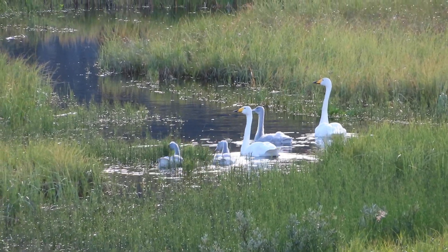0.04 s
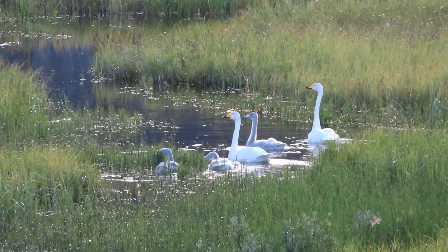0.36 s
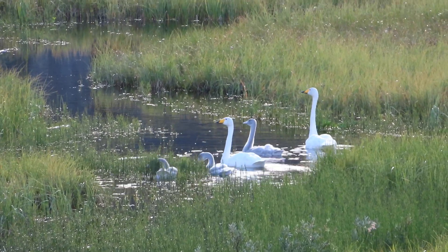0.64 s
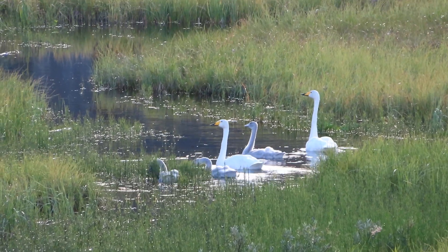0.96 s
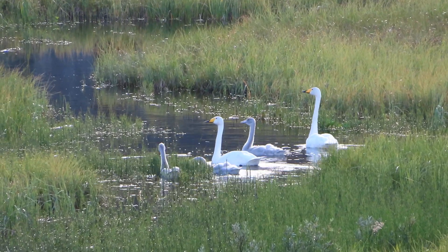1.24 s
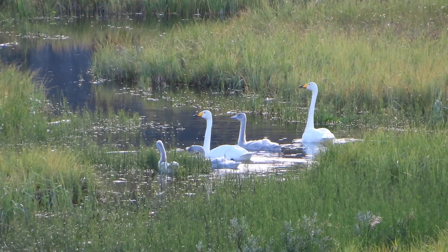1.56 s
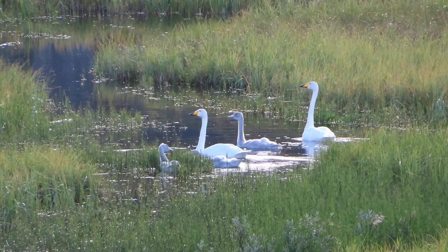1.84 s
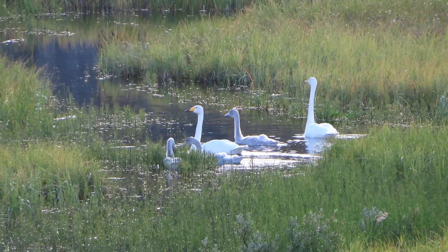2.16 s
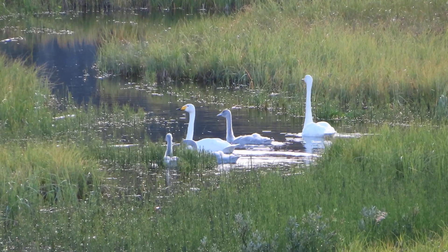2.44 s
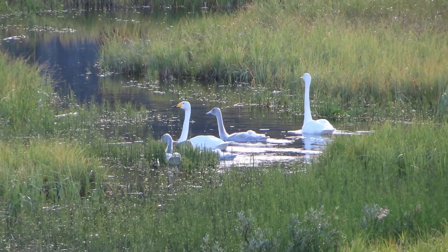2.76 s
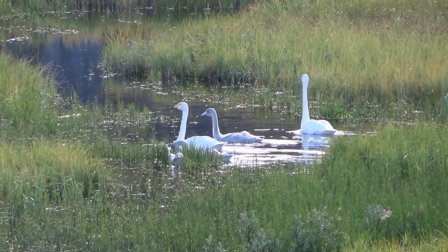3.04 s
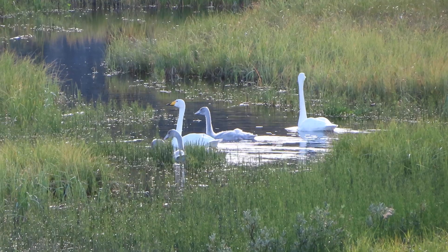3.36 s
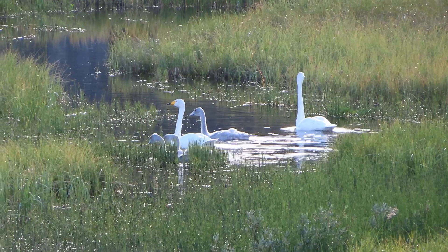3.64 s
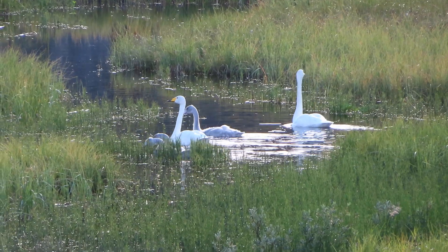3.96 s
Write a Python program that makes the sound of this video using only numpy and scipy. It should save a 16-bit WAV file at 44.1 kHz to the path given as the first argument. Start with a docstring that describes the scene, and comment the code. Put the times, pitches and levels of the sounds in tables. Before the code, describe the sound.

Short, high swan honks repeat at an even pace outdoors, each with a slight echo off the marsh. Wind buffets the microphone throughout over a soft hiss of grass, and cygnets peep faintly between the calls.

```python
"""A swan repeats a short high honk on a marshy pond: a harmonic source, filtered by throat and beak,
starts in a low register, breaks upward into a clear arch and sags away as the air runs out.
Thin peeps, probably the cygnets, and a few dry ticks fall in between. Reeds scatter the calls and
the far bank returns them. Gusts buffet the microphone over a soft hiss of grass."""
import sys
import numpy as np
from scipy import signal
from scipy.fft import rfft, irfft
from scipy.io import wavfile
from scipy.ndimage import uniform_filter1d

SR = 44100
rng = np.random.default_rng(int(sys.argv[2]) if len(sys.argv) > 2 else 0)


def wrap_up_sound(samples):
    """Save the sound to the file named by the first command line argument, as 16-bit audio."""
    columns = np.atleast_2d(samples).T
    # keep every value between -1 and 1, then stretch to whole-number steps
    tamed = np.clip(columns, -1, 1)
    steps = np.round(tamed * 32767).astype(np.int16)
    wavfile.write(sys.argv[1], SR, steps)


N = 176400
T = np.arange(N) / SR

# Resonances of throat and beak: f/Hz, gain/dB
THROAT_RESPONSE = [(600, -20), (1000, -3), (1230, -2), (1550, -2.5), (2000, -4), (2450, -2), (2950, -7.5),
                   (3650, -5.5), (4250, -14), (4900, -19), (5600, -12.5), (5980, -20), (6170, -34.5),
                   (6600, -14.5), (7350, -27.5), (7900, -29.5), (8600, -37), (9400, -60), (11000, -52.5),
                   (12300, -50.5), (13500, -51), (16000, -78.5)]
LOW_START_HZ, LOW_END_HZ, LOW_S = 576.6, 815, .032   # the climb before the register break
BREAK_S, ROUGH_S, CATCH_S, CATCH_DB = .0026, .0034, .004, 5   # the voice jumps, roughens and catches
SCOOP_HZ, WAVER_HZ = 68.4, 3.9   # the jump lands below the crest; the pitch wavers
SAG_HZ, SAG_DB, DROP_HZ, DROP_DB = 211.5, 6, 165, 14.5   # a gentle sag, then a drop as air runs out

def honk(t, rise, fall, crest_hz, db, bright_db, low_db, fundamental_db):
    """Source and filter: harmonics glide through fixed resonances; the register breaks at t = 0."""
    early = np.maximum(-t / LOW_S, 0)
    below_crest = np.clip(1 - t / rise, 0, 1)
    falling = np.maximum((t - rise) / fall, 0)
    drop = np.minimum(falling, 1) ** 6 + 4 * np.maximum(falling - 1, 0)
    upper = .5 + .5 * np.tanh(t / BREAK_S)   # 0 in the low register, 1 in the high
    low_hz = LOW_END_HZ - (LOW_END_HZ - LOW_START_HZ) * early
    high_hz = crest_hz - SCOOP_HZ * below_crest ** 1.6 - SAG_HZ * falling ** 1.3 - DROP_HZ * drop
    high_hz += WAVER_HZ * drift(52, len(t))
    jitter = .0004 + .078 * np.exp(-(t / ROUGH_S) ** 2) + .0026 * (falling ** 2 + 1 - upper)
    hz = np.maximum(low_hz + upper * (high_hz - low_hz), 300)
    phase = 2 * np.pi * np.cumsum(hz * (1 + jitter * drift(500, len(t)))) / SR
    effort_db = (1 - upper) * low_db - SAG_DB * falling
    envelope_db = -18.5 * early ** 3 - CATCH_DB * np.exp(-(t / CATCH_S) ** 2) - DROP_DB * drop
    tilt = bright_db - 2.5 * (drop + early ** 2)   # duller at both ends
    voice = 0
    for k in range(1, 13):
        if k == 1:   # the fundamental gains little from effort
            source_db = fundamental_db + .23 * effort_db
        else:
            source_db = db + effort_db + tilt * np.maximum(np.log2(k * hz / (2 * crest_hz)), 0)
        flutter_db = (.72 + 2.5 * falling) * drift(71, len(t))
        voice += from_db(source_db + at_hz(THROAT_RESPONSE, k * hz) + flutter_db) * np.sin(k * phase)
    rasp = 1 + from_db(-43) * drift(900, len(t))
    return from_db(envelope_db) * voice * rasp

# Calls at the source: break t/s, rise/s, fall/s, crest f/Hz, overtone level/dB, tilt/(dB per octave),
# low-register gain/dB, fundamental level/dB
SWAN_CALLS = [(-.142, 0.04, 0.11, 1242, -13.5, 1, -9, -33), (0.526, 0.05, 0.092, 1233, -15, 3, -10, -28.5),
              (1.186, 0.053, 0.093, 1213, -17, -2.5, -13.5, -33.5),
              (1.851, .057, 0.098, 1250, -21.5, -0.5, -11.5, -31.5),
              (2.499, .054, 0.089, 1235, -24.5, -2.5, -12.5, -32),
              (3.183, .052, .098, 1231, -21, -.5, -11, -33.5), (4.012, .048, .1, 1230, -23, -3, -10.5, -31)]

def swan():
    """Superposition: separate honks, each with its own pitch arch, add up to a run of calls."""
    out = np.zeros(N)
    for break_s, rise, fall, *voicing in SWAN_CALLS:
        on = (T > break_s - 2 * LOW_S) & (T < break_s + rise + 1.4 * fall)
        out[on] += honk(T[on] - break_s, rise, fall, *voicing)
    return out * trapezoid(0, T[-1], edge_s=.003)

# Peeps: t/s, duration/s, start f/Hz, end f/Hz, level/dB
CYGNET_PEEPS = [(0.052, 0.11, 3174, 2990, -48.5), (1.69, .125, 2880, 2430, -53),
                (2.664, 0.058, 2880, 2980, -49), (2.711, 0.041, 3540, 3280, -48.5),
                (3.443, .065, 4080, 4090, -59.5), (3.865, 0.041, 2780, 3040, -43),
                (3.894, 0.094, 3580, 3300, -46)]

def cygnets():
    """Frequency modulation: thin whistles glide and waver, each with a weak second harmonic."""
    out = np.zeros(N)
    waver = 1 + .009 * drift(200)
    for start, length, start_hz, end_hz, db in CYGNET_PEEPS:
        hz = start_hz + (end_hz - start_hz) * np.clip((T - start) / length, 0, 1) ** .8
        phase = 2 * np.pi * np.cumsum(hz * waver) / SR
        whistle = np.sin(phase) + from_db(-19.5) * np.sin(2 * phase)
        out += from_db(db) * trapezoid(start, start + length, edge_s=.011) * whistle
    return out

# Ticks before filtering: t/s, level/dB
TICK_ONSETS = [(0.102, -29), (.125, -28), (1.128, -20.5)]
# Their filter: f/Hz, gain/dB
TICK_RESPONSE = [(600, -18), (1300, 13), (2100, -16.5), (3200, 1), (4200, -6), (5200, -19), (15000, -52)]

def ticks():
    """Transient excitation: brief noise bursts through a peaked filter sound as dry ticks."""
    bursts = sum(from_db(db) * decay(start, tau_s=.002) for start, db in TICK_ONSETS)
    return colour(rng.standard_normal(N) * bursts, TICK_RESPONSE)

# Distinct reflections from the near reeds: delay t/s, level/dB
REED_REFLECTIONS = [(0.0107, -13), (0.025, -20.5)]
# Diffuse echoes: delay t/s, decay time/s, relative level/dB
SCATTER_TAILS = [(.003, .014, -29), (0.021, .12, -30), (0.159, 0.068, -31.5)]
# Their filter: f/Hz, gain/dB
SCATTER_RESPONSE = [(500, 0), (2400, 2), (3600, -2), (5000, -7.5), (12000, -9.5)]
# Treble lift, of which each channel takes a share: f/Hz, gain/dB
TREBLE_LIFT = [(1100, .3), (2400, 2.8), (3600, 2.7), (5500, 5.3), (9000, 2)]
LEFT_LAG_S = .00004

def marsh(calls):
    """Reflection and scattering: water, reeds and the far bank add delayed sound to the direct path."""
    near = calls + sum(from_db(db) * np.interp(T - lag, T, calls, left=0) for lag, db in REED_REFLECTIONS)
    left = colour(np.interp(T - LEFT_LAG_S, T, near), TREBLE_LIFT, share=.86)
    right = colour(near, TREBLE_LIFT, share=.092)
    tails = sum(from_db(db) * decay(lag, tau) * np.sqrt(2 / (tau * SR)) for lag, tau, db in SCATTER_TAILS)
    scatter = diffuse([(20, .011), (20000, .0036)])   # nearly white
    impulse_response = colour(scatter, SCATTER_RESPONSE) * tails
    return np.array([left, right]) + signal.fftconvolve(near[None], impulse_response, axes=1)[:, :N]

# Gust strength: t/s, relative level/dB
GUSTS = [(0.0, -18), (0.07, -18.5), (0.12, -14.5), (0.15, -30.5), (0.2, -20), (0.24, -24.5), (0.34, -17),
         (0.48, -16), (0.6, -27), (0.67, -14.5), (0.71, -20), (0.76, -14.5), (0.92, -20.5), (1.0, -15),
         (1.02, -20.5), (1.19, -21.5), (1.24, -32.5), (1.3, -18.5), (1.36, -17.5), (1.43, -23), (1.45, -19),
         (1.63, -38), (1.65, -21.5), (1.69, -23), (1.77, -28.5), (1.92, -15.5), (1.96, -24.5), (1.98, -19),
         (2.27, -23), (2.28, -19.5), (2.42, -18), (2.54, -29), (2.6, -23.5), (2.67, -29.5), (2.73, -20),
         (2.78, -24.5), (2.81, -19), (3.05, -23), (3.07, -19), (3.19, -33), (3.23, -23.5), (3.29, -33.5),
         (3.36, -26), (3.4, -30), (3.64, -30), (3.68, -22.5), (3.72, -33), (3.9, -26.5), (3.92, -36),
         (4.0, -26.5)]
# Eddy pressure: f/Hz, relative level/dB
EDDY_SPECTRUM = [(20, -36.5), (50, -14), (90, -4.5), (160, 0.5), (270, 2.5), (400, -2), (485, -5),
                 (525, -28.5), (800, -36.5), (1500, -46), (5000, -82.5)]
# Stereo width of the eddies: f/Hz, side level re mid/dB
EDDY_WIDTH = [(100, -53), (180, -43.5), (300, -30.5), (480, -22), (900, -1.5)]
# Hardest buffets: peak t/s, half duration/s, relative level/dB
HARD_BUFFETS = [(.01, 0.012, -32.5), (0.12, 0.017, -41.5), (0.389, 0.019, -31), (.79, 0.027, -40),
                (0.958, .02, -38), (2.37, 0.12, -37), (2.377, 0.0072, -25.5), (2.816, .009, -31),
                (2.86, 0.033, -46)]
# Their splutter: f/Hz, relative level/dB
SPLUTTER_SPECTRUM = [(200, -32), (540, 4), (800, -3), (1100, -13), (1600, -25.5), (4000, -57)]
LUMP_DB, SPLIT_HZ, USUAL_GUST_DB, RIGHT_BIAS_DB, LOW_CUT_HZ = 3, 368, -21.5, 1.7, 56

def wind():
    """Turbulence: eddies thump on the microphone, brighter in gusts; the hardest splutter higher up."""
    gust_db = np.interp(T, *np.transpose(GUSTS))
    lumps = rms_one(from_db(LUMP_DB * np.clip(drift(54.4), -2, 2)))
    mid, side = noise(EDDY_SPECTRUM), colour(noise(EDDY_SPECTRUM), EDDY_WIDTH)
    eddies = np.array([mid + side, mid - side]) * lumps
    eddies /= np.sqrt(uniform_filter1d(eddies[0] ** 2, size=2200))   # evened out over 50 ms
    deep = signal.sosfiltfilt(signal.butter(2, SPLIT_HZ, fs=SR, output="sos"), eddies)
    bright_db = .77 * (gust_db - USUAL_GUST_DB) + RIGHT_BIAS_DB * np.array([[-.5], [.5]])
    rumble = from_db(gust_db - .5) * (deep + (eddies - deep) * from_db(bright_db))
    buffets = sum(from_db(db) * np.exp(-((T - peak) / half) ** 2) for peak, half, db in HARD_BUFFETS)
    splutter = diffuse(SPLUTTER_SPECTRUM) * np.sqrt(lumps) * buffets
    return signal.sosfilt(signal.butter(2, LOW_CUT_HZ, "high", fs=SR, output="sos"), rumble + splutter)

# Grass and distant air: f/Hz, relative level/dB
GRASS_SPECTRUM = [(30, 7.5), (300, 2), (600, 3.5), (1000, 1.5), (1600, -1.5), (2500, -6), (3600, -10),
                  (4400, -17), (7000, -24), (9500, -29.5), (13000, -37.5), (15500, -38.5)]
GRASS_DB, GRASS_FADE_DB_PER_S = -43.5, .5

def grass():
    """Broadband flow noise: a soft hiss of grass that flickers slightly and slowly eases."""
    return from_db(GRASS_DB - GRASS_FADE_DB_PER_S * T + .52 * drift(14)) * diffuse(GRASS_SPECTRUM)

# Stereo width of sound from all around: f/Hz, side level re mid/dB
DIFFUSE_WIDTH = [(100, -31.5), (500, -26), (1200, -21.5), (2500, -10), (4500, -2), (10000, 1)]

def diffuse(spectrum):
    """Diffuse field: two channels of noise, coherent in the bass and unrelated in the treble."""
    mid, side = noise(spectrum), colour(noise(spectrum), DIFFUSE_WIDTH)
    return np.array([mid + side, mid - side])

def noise(spectrum):
    """Spectral shaping of white noise, at unit rms."""
    return rms_one(colour(rng.standard_normal(N), spectrum))

def drift(rate_hz, size=N):
    """Random modulation: low-passed noise at unit rms."""
    hz = np.fft.rfftfreq(size, 1 / SR)
    return rms_one(irfft(rfft(rng.standard_normal(size)) / (1 + (hz / rate_hz) ** 4), size))

def colour(x, spectrum, share=1):
    """Zero-phase filtering by a share of a curve in decibels."""
    return irfft(rfft(x) * from_db(share * at_hz(spectrum, np.fft.rfftfreq(N, 1 / SR))), N)

def at_hz(spectrum, hz):
    """Interpolation of level on a log-frequency axis."""
    f, db = np.transpose(spectrum)
    return np.interp(np.log(np.maximum(hz, 1)), np.log(f), db)

def decay(start, tau_s):
    """Exponential decay after a sudden onset."""
    return (T > start) * np.exp(-np.abs(T - start) / tau_s)

def trapezoid(start, end, edge_s):
    """Envelope with linear attack and release."""
    return np.clip(np.minimum(T - start, end - T) / edge_s, 0, 1)

def from_db(db):
    """Level to amplitude ratio."""
    return 10 ** (np.asarray(db) / 20)

def rms_one(x):
    """Normalisation to unit rms."""
    return x / np.sqrt(np.mean(x ** 2) + 1e-20)

def scene():
    """Superposition: birds and their echoes add to ticks, wind and grass."""
    return marsh(swan() + cygnets()) + ticks() + wind() + grass()

STOPBAND_HZ = 15600

def record(dry):
    """Band limiting: a steep low-pass filter removes the highest treble."""
    return signal.sosfilt(signal.cheby2(12, 70, STOPBAND_HZ, fs=SR, output="sos"), dry)

dry = scene()
out = record(dry)
wrap_up_sound(out)
```